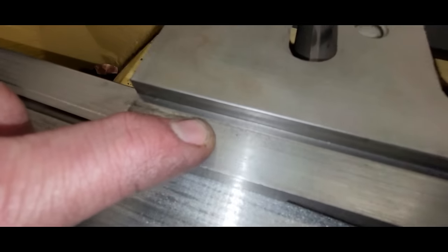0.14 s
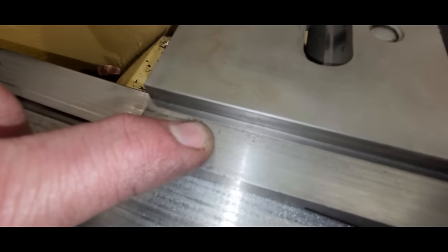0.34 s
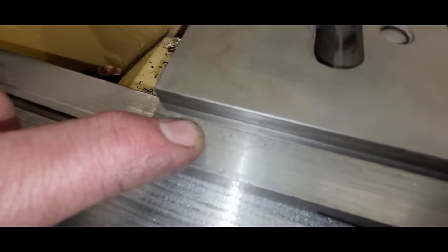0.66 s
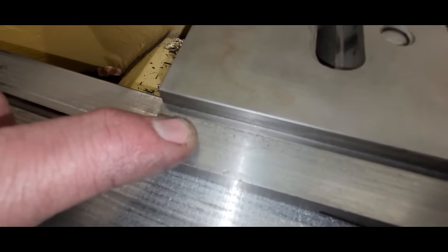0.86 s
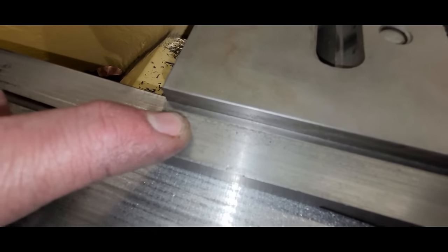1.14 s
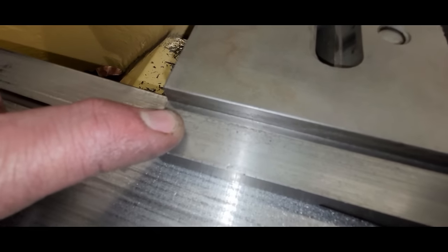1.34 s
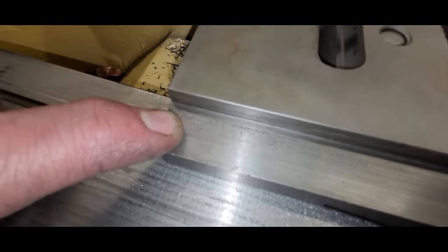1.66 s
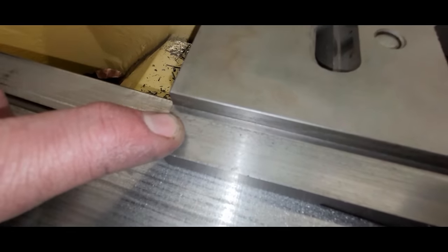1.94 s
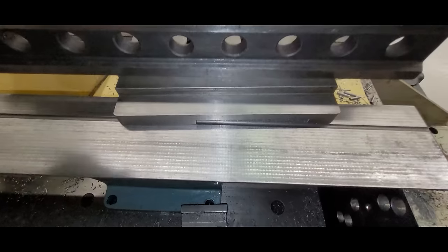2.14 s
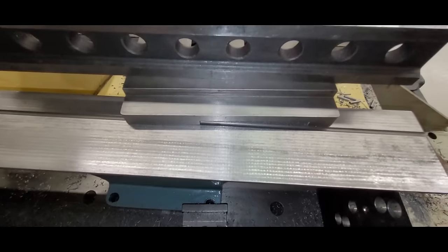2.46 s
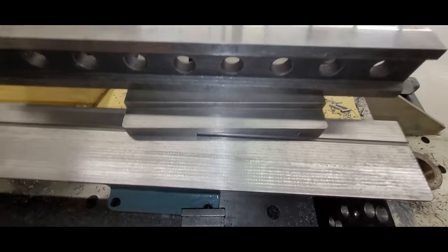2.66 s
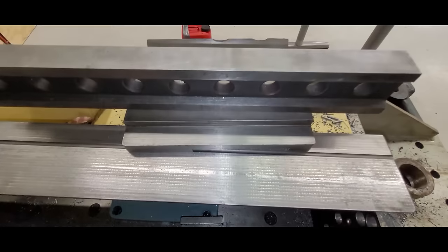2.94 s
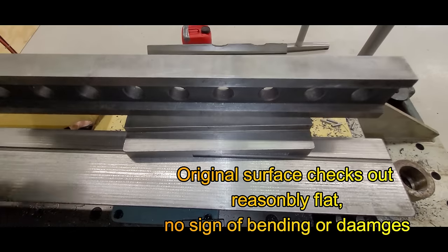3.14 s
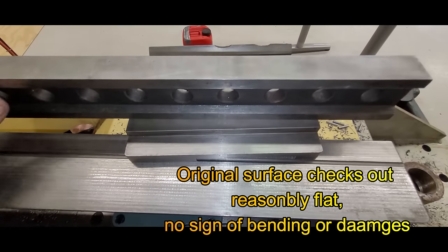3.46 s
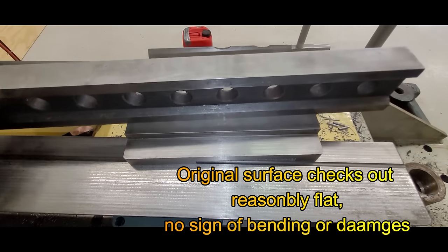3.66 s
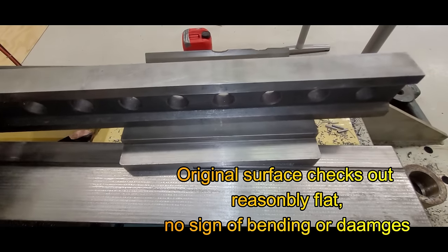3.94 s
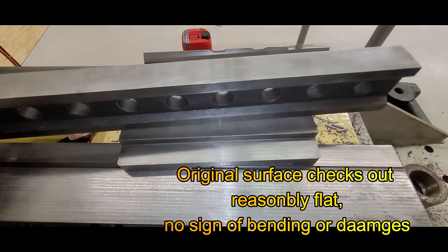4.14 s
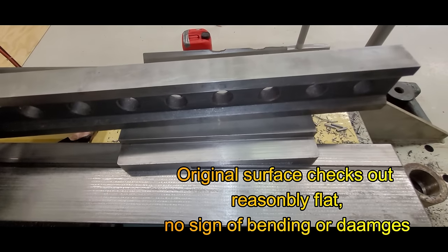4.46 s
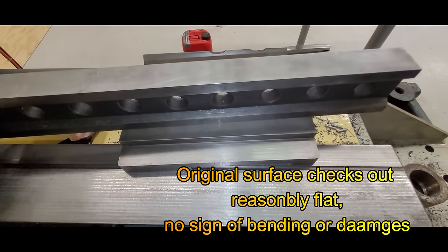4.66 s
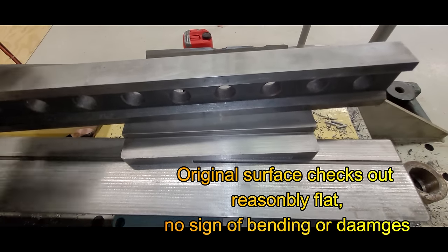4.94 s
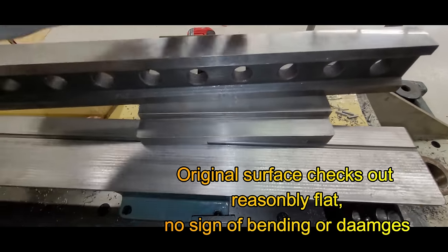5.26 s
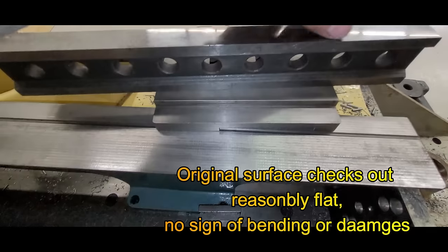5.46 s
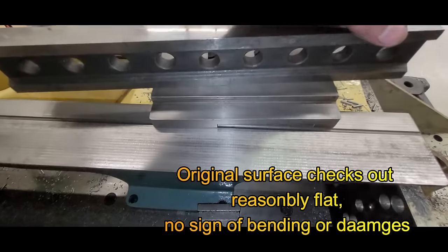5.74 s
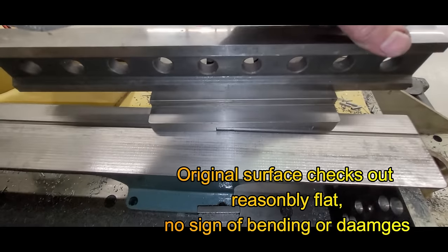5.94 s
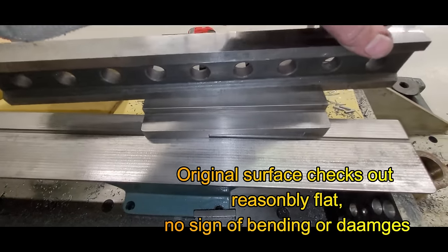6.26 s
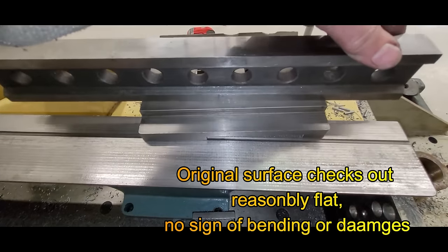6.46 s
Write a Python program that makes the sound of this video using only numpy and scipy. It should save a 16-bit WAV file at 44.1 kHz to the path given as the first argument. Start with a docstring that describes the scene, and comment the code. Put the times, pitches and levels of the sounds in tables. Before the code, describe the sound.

A large workshop machine drones steadily with a hollow low boom and soft airy roar, one sharp click partway, and faint wind buffets on the right.

```python
"""Workshop, large machine near a handheld two-port microphone: blade tones and mains hum (wavering sines),
air noise booming in the hollow frame (noise in narrow bands), broad roar and hiss (coloured noise).
Levels, colour and port lag change slowly up to a sharp click (decaying step), jump there, then settle.
Draught buffets mostly the right port (low puffs and turbulence); two faint taps (decaying sines) land there."""
import sys
import numpy as np
from scipy import signal
from scipy.fft import irfft
from scipy.io import wavfile
from scipy.ndimage import uniform_filter1d

SR = 44100
rng = np.random.default_rng(int(sys.argv[2]) if len(sys.argv) > 2 else 0)


def wav_record(signal):
    """Record a signal, one row per channel, as 16-bit PCM in the file named by sys.argv[1]."""
    frames = np.transpose(np.atleast_2d(signal))
    bounded = np.clip(frames, -1, 1)
    # unit amplitude maps onto the largest positive 16-bit level
    quanta = np.round(bounded * 32767).astype(np.int16)
    wavfile.write(sys.argv[1], SR, quanta)


N = 291501

# Change at the click: share done just before and just after it [0-1], time constants
CLICK_S = 2.50394
SHARE_BEFORE, APPROACH_S, SHARE_AFTER, SETTLE_S = 0.75, 0.28, 0.87, 0.25
# Port lag, and roar up to TREBLE_FROM_HZ: smaller share done before the click
MID_SHARE_BEFORE, TREBLE_FROM_HZ = 0.2, 2500.0
# Port likeness: (frequency [Hz], coherence [0-1], right-port lag before click [rad], after click [rad])
PORT_LIKENESS = [(60, 0.89, -0.3, 0.5), (121, 1, 0.22, 0), (250, 0.95, 0.3, 0.4), (345, 0.99, 0.26, -0.07),
                 (420, 0.96, 0.24, -0.44), (696, 0.78, 0.3, -0.1), (1090, 0.87, 0.5, 0.5),
                 (1266, 0.47, -2, -0.5), (1376, 0.4, -4.5, -0.7), (1490, 0.34, -6.5, -2),
                 (1654, 0.63, -6., -5.5), (2000, 0.68, -5, -6), (2570, 0.48, -4.5, -5),
                 (3500, 0.27, -4.5, -4.5), (6000, 0.1, -1.5, -4.5)]
# Chance rises and dips of noise level in narrow bands:
# (peak time [s], half length [s], centre [Hz], width [Hz], left [dB], right [dB])
RISES_AND_DIPS = [(2.1, 0.42, 4000, 1400, -.5, 2), (2.0, .4, 1850, 300, -2, 0),
                  (2.65, 0.22, 1250, 300, -0.5, -2), (2.7, .15, 1900, 300, 0, -4),
                  (2.7, .2, 5800, 1500, -2, -2), (3.5, .3, 1300, 250, 1, 1.5),
                  (3.5, .5, 1700, 300, -1, -0.5), (4.4, 0.22, 1300, 250, 2, 1),
                  (4.4, 0.23, 1850, 300, 1.5, 0.5), (5.9, .4, 2000, 300, -3.5, -1),
                  (6.4, .15, 1700, 250, 1, 2), (.55, .2, 353, 50, -3, -3), (2.94, 0.099, 340, 40, 2.5, 2.5),
                  (3.3, 0.091, 324, 56, 2.5, 3), (4.55, .15, 345, 50, 2.5, 3), (4.5, .3, 99, 50, 3, 3),
                  (3.3, .3, 89, 50, 3, 3), (3.8, .5, 680, 150, 1, 1.5), (2.65, .2, 1600, 250, -2, -2),
                  (3.1, .3, 1800, 200, 1.5, 1.5), (6.3, .3, 950, 250, 1.5, 1.5),
                  (1.1, .4, 480, 150, -1.5, -1.5), (2.2, .6, 290, 50, 2, 2)]

# Blade tones: (multiple of BLADE_HZ, level before click [dB rms], after click [dB rms]), before port trim
BLADE_TONES = [(1, -35.5, -35.5), (2, -38, -41.5), (3, -40, -38)]
BLADE_HZ = 116.08
HUM_HZ, HUM_BEFORE_DB, HUM_AFTER_DB = 99.85, -41.5, -41.5  # rms, before port trim

# Frame hollows: (centre [Hz], width [Hz], peak before click [dB per Hz], after click [dB per Hz]),
# before level drift and port trim
HOLLOWS = [(96.2, 17, -52.5, -53.5), (146, 22, -55.5, -56), (172.5, 21.7, -43.5, -45),
           (190, 12, -52, -50.5), (200.4, 16, -52.5, -54.5), (244.2, 27, -47, -50.5),
           (282.2, 12.7, -40.5, -40.5), (296, 12, -46.5, -54.5), (271, 10, -52.5, -47.5),
           (329, 8, -59.5, -45.5), (334.5, 12.8, -47, -45.5), (343.8, 8.4, -48.5, -44),
           (358.3, 9, -47, -48.5), (384.6, 36, -57, -57), (472, 22, -67.5, -62.5), (508, 22, -61, -74),
           (575, 26, -67, -68.5), (639, 19, -66, -65.5), (698, 17, -86, -63.5), (841, 39, -66, -70)]
# Airflow under the boom: (frequency [Hz], density [dB per Hz]), before level drift and port trim
AIRFLOW = [(15, -99), (40, -78.5), (70, -67), (88, -60), (105, -58), (111, -54), (125, -59.5), (140, -56.5),
           (210, -61), (300, -52), (420, -65.5), (700, -109), (3000, -150)]
# Random level drift of the booming noise: (time [s], gain of bands 1 to 4, low to high [dB] each)
BAND_DRIFT = [(.15, -3.5, 1, -1, 1.5), (.45, 0, 3, 1.5, -2.5), (.75, 0.5, -1, 1.5, -4.5),
              (1.05, 2, -1, 4, 3.5), (1.35, -0.5, 3.5, -3.5, -1.5), (1.65, 1, -5, -3.5, 0.5),
              (1.95, 1, 2.5, 1, 2.5), (2.4, 0, 3.5, 1, -2.5), (2.85, 0, -6.5, -2, 4),
              (3.15, -1.5, 0.5, -3.5, 1), (3.45, -1.5, 3, 0, 1), (3.75, 1, -0.5, 0.5, 2),
              (4.05, -2.5, 1, 2, 1), (4.4, 4, -5, 2, 2.5), (4.65, 0.5, -7, 1.5, 3.5), (4.95, 2, 0, 4.5, 0),
              (5.25, 1.5, 5, -6, 0.5), (5.6, -3, -6, 0, -0.5), (5.85, 4.5, -9, -0.5, 1),
              (6.15, -3, 4, 0.5, -1), (6.48, 4, 0, 0.5, 8)]
# Edges of the four drifting bands [Hz]
BAND_EDGES_HZ = (135, 215, 262, 305, 375)
STEADY = 0.43  # 0-1: how firmly other chance level changes are evened out

# Roar and hiss: (frequency [Hz], left, right before click [dB per Hz], left, right after click [dB per Hz]),
# before lifts and flicker
ROAR = [(394, -56.5, -60.5, -60, -58.5), (507, -69, -65.5, -67, -66.5), (704, -71.5, -71.5, -72.5, -72),
        (1070, -71, -72.5, -75.5, -75), (1490, -78, -69.5, -77.5, -72), (2066, -77, -70.5, -79.5, -72),
        (2970, -85, -77.5, -83.5, -76), (4250, -88, -86, -86, -81), (5580, -94.5, -96, -94, -88.5),
        (7100, -99.3, -109.6, -99.8, -101.5), (10000, -104.3, -116.2, -103.2, -108.3),
        (11500, -102.2, -119.7, -102.5, -113.7), (14500, -106.5, -122.0, -106.6, -122.6),
        (15700, -110.8, -123.9, -113.8, -122.9)]
# Nearby-surface resonances: (centre [Hz], width [Hz], left, right lift before click [dB],
# left, right lift after click [dB])
SURFACES = [(594, 67, 8, 1.5, 2.5, 2.5), (940, 144, 1.5, -1, 1, 4.5), (1199, 83, 0.5, 3, 5, 4.5),
            (1307, 107, -2, -5, 3.5, 3), (1540, 130, 3.5, -0.5, 0, 1.5), (1900, 140, -2, 1, 3.5, 2),
            (2580, 430, 2.5, 3, 2, -1), (3630, 680, 0.5, -0.5, 0, 0.5), (4900, 550, 3.5, -2.5, 1.5, -2.5),
            (6500, 600, -1, -2, 1.5, 1), (7970, 900, 2.5, -1, 2.5, -4), (9600, 900, 1, -2, -0.5, -0.5),
            (10600, 700, -1, -7, -0.5, 1), (12100, 900, -2, -3, -2, -8)]
# Rough whistles and gaps: (centre [Hz], width [Hz], lift before click [dB], after click [dB])
WHISTLES = [(470, 30, -3, 0), (530, 30, -1.5, -1.5), (996, 40, 2.5, 2.5), (1040, 50, 0.5, -2),
            (1457, 39, -0.5, -2.5), (1703, 21, 2.5, 2.5), (1715, 25, 0, -4), (1760, 36, 3.5, 5),
            (1825, 25, -2, -3), (1900, 90, 0.5, 2), (1955, 30, 0, -1.5), (2325, 60, 0.5, 2.5)]
ROAR_RISE_S, ROAR_RISE_HALF_S, ROAR_RISE_DB = 4, 0.73, 0.68

# Right-port gusts: (peak time [s], level [dB rms])
GUSTS = [(1.64, -44), (1.72, -38), (1.77, -39), (1.94, -44), (2.06, -42), (2.11, -41), (2.18, -42),
         (2.28, -49), (2.415, -35), (5.035, -35), (5.155, -38)]
DRAUGHT_BAND_HZ = (42, 72)
GUST_HALF_S, PUFF_HZ, PUFF_SHARE, CALM_DB = 0.036, 53.37, 0.91, -58.5

# Right-port taps: (time [s], starting level [dB])
TAPS = [(2.0765, -21), (2.157, -22)]
TAP_HZ, TAP_T60_S = 1150, 0.0094

CLICK_PORT_DB, CLICK_DECAY_MS = (-22, -25), 1.0  # left, right; step height before edge lift
CLICK_EDGE_HZ, CLICK_EDGE_WIDTH_HZ, CLICK_EDGE_LIFT_DB = 14000, 4500, (6, 2)
BAND_LIMIT_HZ = 15720


def amp(db):
    """Decibels to gain."""
    return 10 ** (np.asarray(db) / 20)


def evened(x):
    """Scale to rms 1."""
    return x / np.sqrt(np.mean(x ** 2) + 1e-20)


def bell(hz, centre_hz, width_hz):
    """Gaussian band, 1 at its centre."""
    return np.exp(-2 * ((hz - centre_hz) / width_hz) ** 2)


def read(points, hz, column=1):
    """Interpolate a spectrum column on a log-frequency axis."""
    table = np.transpose(points)
    return np.interp(np.log(hz + 1), np.log(table[0] + 1), table[column])


def follow(rows, t):
    """Control curves of a table at times t."""
    s, *curves = np.transpose(rows)
    return [np.interp(t, s, curve) for curve in curves]


def wander(t, top_hz):
    """Slow random curve: sines from 0.2 Hz to top_hz, rms 1."""
    slow_t = t[::64]
    total = np.zeros(len(slow_t))
    for f in np.geomspace(0.2, top_hz, num=24):
        total += np.sin(2 * np.pi * (f * slow_t + rng.random())) / np.sqrt(f)
    return np.interp(t, slow_t, evened(total))


def across_click(t, before, after, early=SHARE_BEFORE):
    """Blend two values: changes slowly up to the click, jumps there, then settles."""
    since = t - CLICK_S
    approaching = early * np.exp(np.minimum(since, 0) / APPROACH_S)
    settling = 1 - (1 - SHARE_AFTER) * np.exp(-np.maximum(since, 0) / SETTLE_S)
    share = np.where(since < 0, approaching, settling)
    return before + np.clip(share, 0, 1) * (after - before)


def port_lag(hz, t):
    """Phase lag [rad] of right port behind left."""
    before_rad, after_rad = read(PORT_LIKENESS, hz, column=2), read(PORT_LIKENESS, hz, column=3)
    return across_click(t, before_rad, after_rad, MID_SHARE_BEFORE)


def rise_and_dip_db(hz, t):
    """Chance rises and dips of the noise level in narrow bands, at both ports."""
    s, half_s, centre_hz, width_hz, *port_db = np.transpose(RISES_AND_DIPS)
    in_band = bell(hz, centre_hz, width_hz)
    in_time = np.exp(-((t[:, None] - s) / half_s) ** 2)
    return np.array([(in_band * db) @ in_time.T for db in port_db])


def port_noise(size):
    """Short-time spectra of 0 dB per Hz noise, ports partly coherent and lagged."""
    white = rng.standard_normal((2, N)) * np.sqrt(SR / 2)
    hz, t, (a, b) = signal.stft(white, SR, nperseg=size, noverlap=size * 3 // 4)
    hz = hz[:, None]
    same = np.clip(read(PORT_LIKENESS, hz), 0, 1)
    right = same * np.exp(-1j * port_lag(hz, t)) * a + np.sqrt(1 - same ** 2) * b
    return hz, t, np.array([a, right])


def to_sound(z, size):
    """Short-time spectra back to sound."""
    return signal.istft(z, SR, nperseg=size, noverlap=size * 3 // 4)[1][:, :N]


def tones():
    """Mains hum and phase-locked blade harmonics, each wavering in level, with slow phase wander."""
    t, out = np.arange(N) / SR, np.zeros((2, N))
    blade_rad = 2 * np.pi * (BLADE_HZ * t + rng.random()) + 0.26 * wander(t, 1.5)
    hum_rad = 2 * np.pi * (HUM_HZ * t + rng.random()) + 0.5 * wander(t, 1.5)
    lines = [(HUM_HZ, hum_rad, HUM_BEFORE_DB, HUM_AFTER_DB)]
    lines += [(k * BLADE_HZ, k * blade_rad, before, after) for k, before, after in BLADE_TONES]
    for hz, line_rad, before_db, after_db in lines:
        phase = line_rad + 2 * np.pi * rng.random() - [0 * t, port_lag(hz, t)]
        waver_db = 0.69 * hz / BLADE_HZ * wander(t, 2.6)  # higher lines waver more
        level = amp(across_click(t, before_db, after_db) + waver_db)
        out += np.sqrt(2) * level * np.sin(phase)
    return out * amp([[0.3], [-0.3]])  # port trim


def boom():
    """Turbulent air excites frame hollows: noise in narrow resonances, level drifting in four bands."""
    hz, t, z = port_noise(size=16384)
    power = amp(read(AIRFLOW, hz)) ** 2
    for centre_hz, width_hz, before_db, after_db in HOLLOWS:
        shape = 1 / (1 + (2 * (hz - centre_hz) / width_hz) ** 2) ** 2  # resonance squared: steep skirts
        power = power + amp(across_click(t, before_db, after_db)) ** 2 * shape
    noise_power = abs(z[0]) ** 2
    typical, gain = np.mean(noise_power), np.ones(power.shape)
    for low, high, drift_db in zip(BAND_EDGES_HZ, BAND_EDGES_HZ[1:], follow(BAND_DRIFT, t)):
        band = (hz >= low) & (hz < high)
        chance = (band * power * noise_power).sum(0) / (band * power * typical).sum(0)
        steadied = amp(drift_db) / np.clip(chance, 0.25, 4) ** (STEADY / 2)
        gain = np.where(band, steadied, gain)
    shaped = z * gain * amp(rise_and_dip_db(hz, t)) * np.sqrt(power)
    return to_sound(shaped, size=16384) * amp([[-1.1], [-1.7]])  # port trim


def roar_colour_db(hz):
    """Roar spectrum (left, right before click; left, right after) with resonances and room ripple."""
    colour_db = np.array([read(ROAR, hz, column=k) for k in range(1, len(ROAR[0]))])
    for centre_hz, width_hz, *lift_db in SURFACES:
        colour_db = colour_db + np.array(lift_db)[:, None, None] * bell(hz, centre_hz, width_hz)
    for centre_hz, width_hz, before_db, after_db in WHISTLES:
        lift_db = np.array([before_db, before_db, after_db, after_db])[:, None, None]
        colour_db = colour_db + lift_db * bell(hz, centre_hz, width_hz)
    # standing waves of the room
    ripple = evened(uniform_filter1d(rng.standard_normal(colour_db.shape), size=4, axis=1))
    return colour_db + 1.15 * ripple / (1 + (hz / 4000.0) ** 2)


def roar_flicker_db(hz, t):
    """Random level patches, strongest in the treble, one slight rise, and slow drift."""
    shape = (2, len(hz), len(t))
    patches = uniform_filter1d(rng.standard_normal(shape), size=8, axis=1)
    patches = evened(uniform_filter1d(patches, size=2, axis=2))
    treble = np.clip(np.log2((hz + 1) / 3500.0), 0, 2)
    quick = evened(uniform_filter1d(rng.standard_normal((2, 1, len(t))), size=2))
    rise_db = ROAR_RISE_DB * np.exp(-((t - ROAR_RISE_S) / ROAR_RISE_HALF_S) ** 2)
    # colour drifts slowly, least in the treble
    drift = uniform_filter1d(rng.standard_normal(shape), size=3, axis=1)
    drift = evened(uniform_filter1d(drift, size=30, axis=2))
    drift_db = 0.9 * drift / (1 + (hz / 3200.0) ** 2)
    return (0.64 + 1.3 * treble) * patches + 0.65 * treble * quick + rise_db + drift_db


def roar():
    """Broad machine noise; colour at each port shifts around the click, treble flickers."""
    hz, t, z = port_noise(size=2048)
    colour_db = roar_colour_db(hz)
    early = np.where(hz > TREBLE_FROM_HZ, SHARE_BEFORE, MID_SHARE_BEFORE)
    level_db = across_click(t, colour_db[:2], colour_db[2:], early)
    level_db = level_db + roar_flicker_db(hz, t) + rise_and_dip_db(hz, t)
    high_pass = 1 / np.sqrt(1 + (400.0 / (hz + 1)) ** 8)  # boom takes over below
    return to_sound(z * high_pass * amp(level_db), size=2048)


def draught():
    """Low buffeting, almost only right: faint turbulence plus gusts of puff and turbulence."""
    band = signal.butter(2, DRAUGHT_BAND_HZ, "bandpass", fs=SR, output="sos")
    t = np.arange(N) / SR
    turbulence = evened(signal.sosfilt(band, rng.standard_normal(N)))
    out = amp(CALM_DB) * turbulence
    for s, db in GUSTS:
        start_cycle, detune = rng.random(2)
        puff_hz = PUFF_HZ * (1 + 0.202 * (detune - 0.5))
        puff = np.sqrt(2) * np.sin(2 * np.pi * (puff_hz * t + start_cycle))
        mix = PUFF_SHARE * puff + np.sqrt(1 - PUFF_SHARE ** 2) * turbulence
        out = out + amp(db) * np.exp(-((t - s) / GUST_HALF_S) ** 2) * mix
    return out * amp([[-35.0], [0]])


def taps():
    """Short dull ticks close to the right port: decaying sines."""
    out = np.zeros(N)
    for s, db in TAPS:
        since = np.maximum(np.arange(N) / SR - s, 0)
        out += amp(db - 60 * since / TAP_T60_S) * np.sin(2 * np.pi * TAP_HZ * since)
    return out * amp([[-14.0], [0]])


def click():
    """Sharp click: a sudden step with a bright edge, decaying within milliseconds."""
    hz = np.fft.rfftfreq(N, 1 / SR)
    delay = np.exp(-2j * np.pi * hz * (CLICK_S + 0.5 / SR))
    step = -SR * delay / (2j * np.pi * hz + 1000 / CLICK_DECAY_MS)  # spectrum of a decaying step
    edge_db = np.array(CLICK_EDGE_LIFT_DB)[:, None] * bell(hz, CLICK_EDGE_HZ, CLICK_EDGE_WIDTH_HZ)
    port_db = np.array(CLICK_PORT_DB)[:, None]
    return irfft(step * amp(edge_db + port_db), N)


def scene():
    """Sum all sources at the two ports."""
    return tones() + boom() + roar() + draught() + taps() + click()


def record(dry):
    """Band limit of the recorder: linear-phase low-pass."""
    low_pass = signal.firwin(1023, BAND_LIMIT_HZ, window=("kaiser", 9), fs=SR)
    return signal.oaconvolve(dry, low_pass[None], "same")


dry = scene()
out = record(dry)
wav_record(out)
```